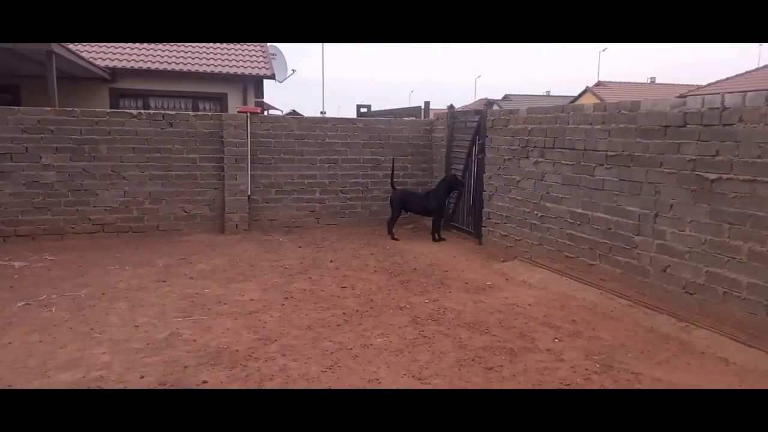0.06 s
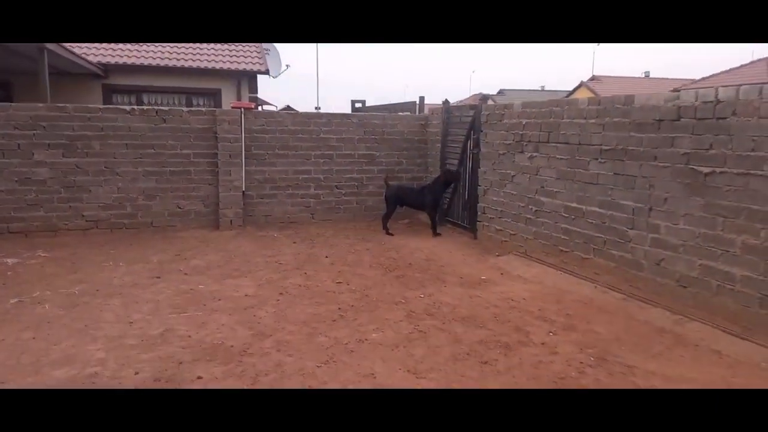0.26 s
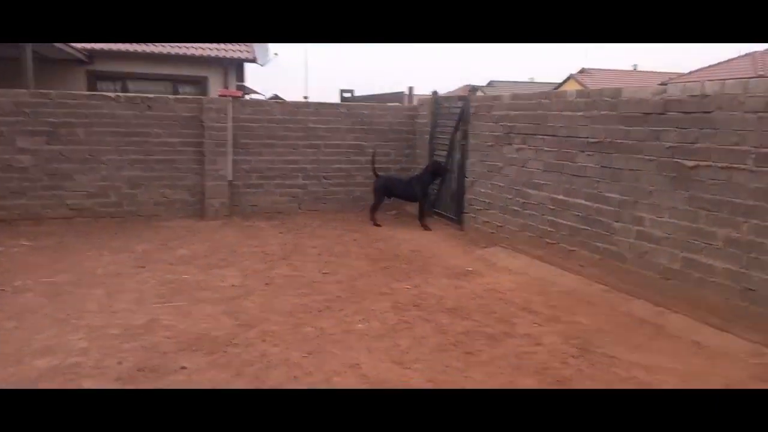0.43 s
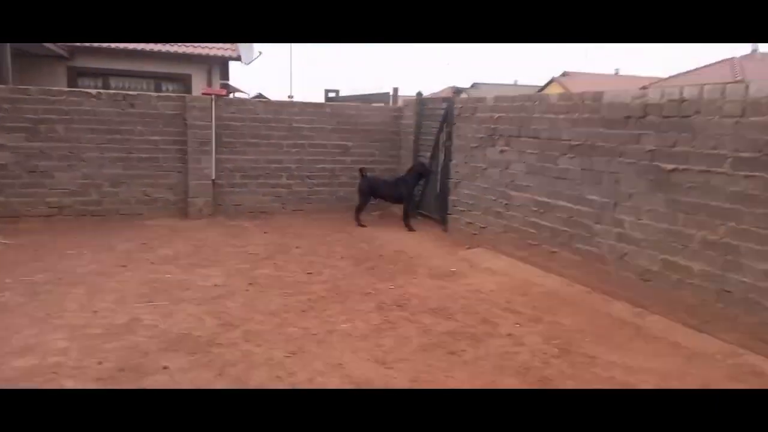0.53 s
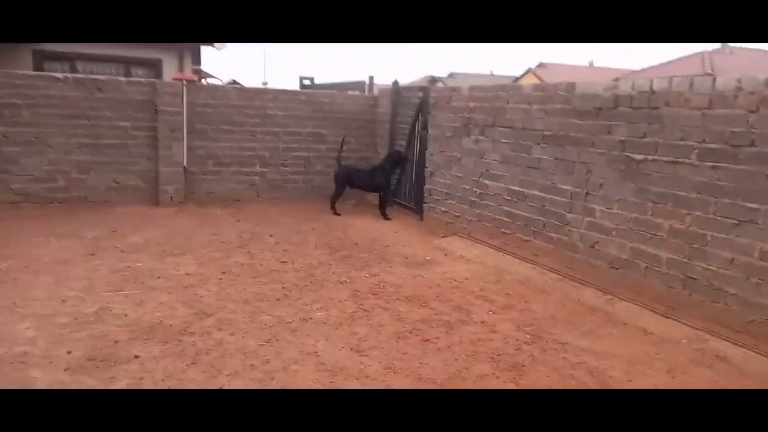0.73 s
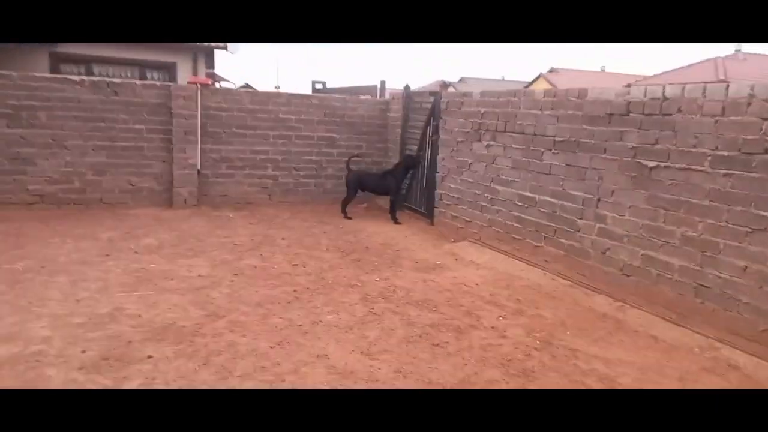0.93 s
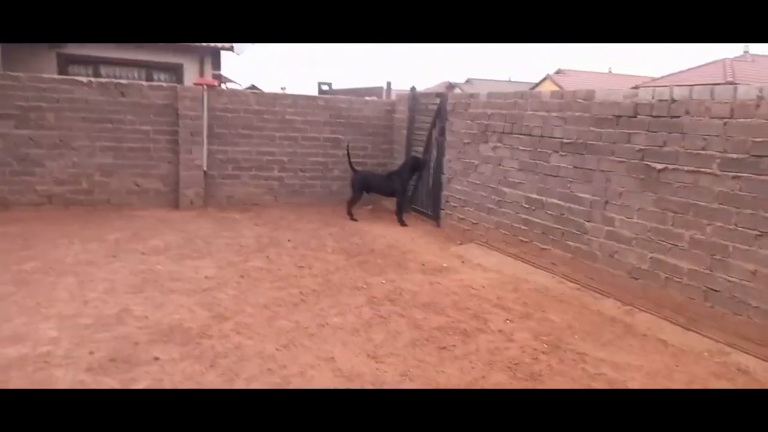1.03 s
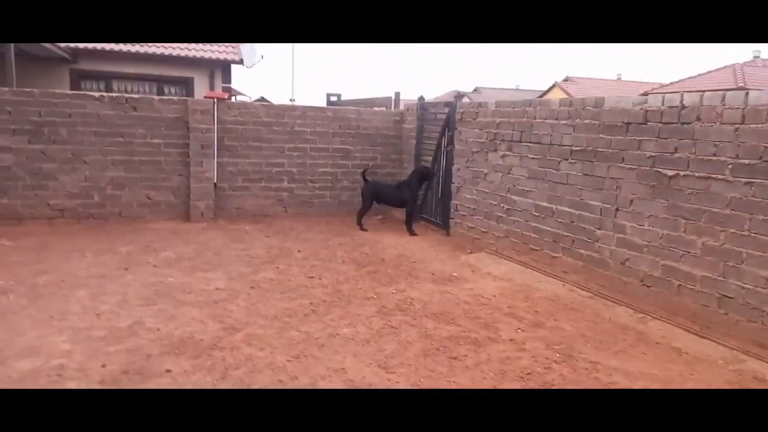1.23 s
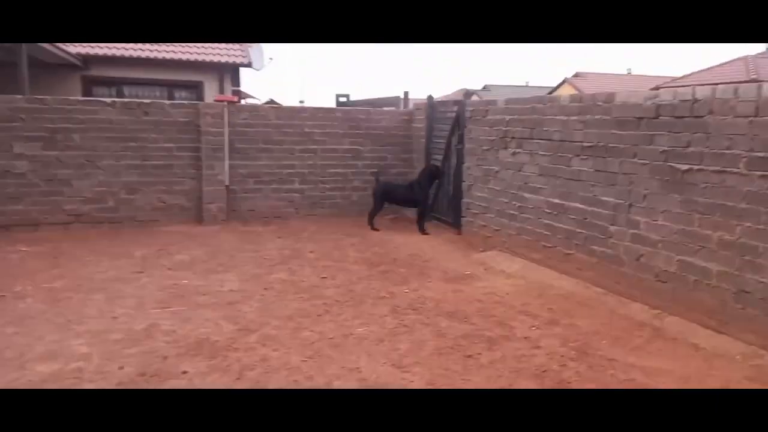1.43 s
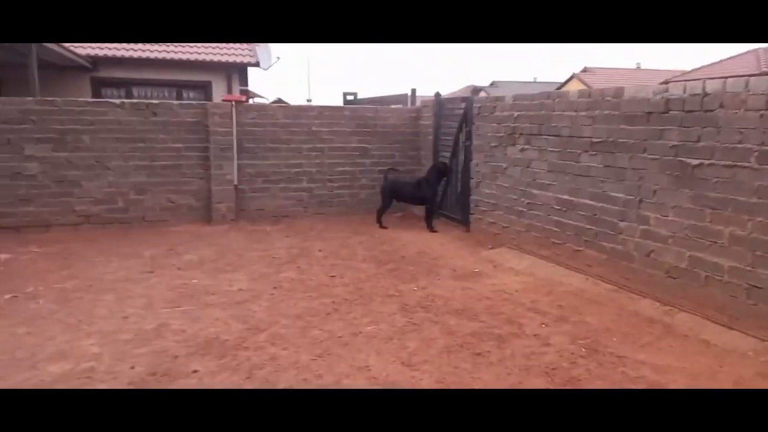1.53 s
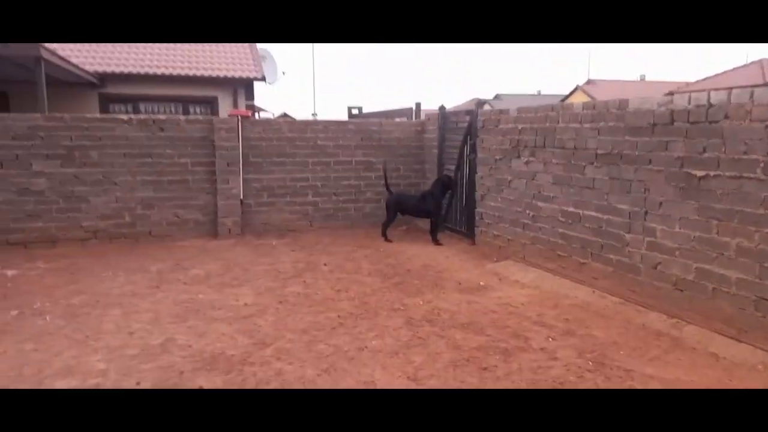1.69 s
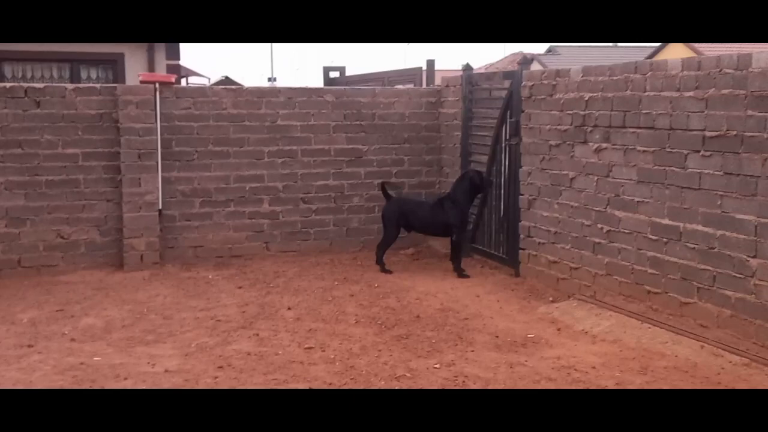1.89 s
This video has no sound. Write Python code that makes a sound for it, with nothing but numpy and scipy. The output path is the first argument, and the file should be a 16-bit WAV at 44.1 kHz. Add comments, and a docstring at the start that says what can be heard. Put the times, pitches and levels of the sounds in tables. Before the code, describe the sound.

Two deep, throaty barks from a big dog echo around a walled yard over faint traffic.

```python
"""Far traffic hums and insects hiss throughout, in a brick-walled yard.
At 0.2 s and again at 0.9 s a large dog barks: a throaty start, a rough rising shout, a clear top note.
Each bark sums a clean fundamental, jittery overtones, a hoarse chest tone and noise; the walls slap it
back and ring on. From 1.3 s a far bird calls, as fluttering overtones of a nearly steady pitch near 680 Hz.
A limiter holds the peaks, which still clip a little."""
import sys
import numpy as np
from scipy import signal
from scipy.fft import rfft, irfft, next_fast_len
from scipy.io import wavfile
from scipy.ndimage import uniform_filter1d, minimum_filter1d, map_coordinates

SR = 44100
rng = np.random.default_rng(int(sys.argv[2]) if len(sys.argv) > 2 else 0)


def volts_from_decibels(level):
    """Turn decibel levels (scalar or array-like) into linear amplitude factors."""
    exponent = np.asarray(level, float) / 20
    return 10 ** exponent


def persist_wave(psi):
    """Save psi, clipped to +-1, as 16-bit WAV."""
    counts = np.round(np.clip(psi, -1, 1) * 32767).astype(np.int16)
    wavfile.write(sys.argv[1], SR, np.atleast_2d(counts).T)


N = 85995

# Spectrum shape of the far traffic and air: (frequency [Hz], relative density [dB per Hz])
TOWN_SPECTRUM = [(15, -31), (25, -35.5), (46, -16.5), (62, -3.5), (118, -6.5), (230, -7), (341, -9.5),
                 (443, -13.5), (1090, -18.5), (1450, -21), (2300, -30), (3500, -36.5), (5000, -44.5),
                 (7800, -47), (10000, -59), (13000, -46.5), (15500, -52.5)]
# Likeness of the town sound on the two sides: (frequency [Hz], correlation [-1 to 1])
TOWN_LIKENESS = [(30, 0.55), (70, 0.94), (150, 0.88), (400, 0.62), (1000, 0), (4000, 0.054)]
# Far bird call: (time [s], pitch [Hz], gain of overtones 2, 3, 4, 5, 6 [dB each])
BIRD_CALL = [(1.32, 700, -80, -80, -75, -80, -85), (1.42, 703, -70, -76, -66, -68, -79),
             (1.5, 690, -57, -75, -72, -74, -78), (1.57, 672, -49, -64, -74, -64, -76),
             (1.66, 682, -50, -52, -72, -60, -73), (1.74, 681, -49, -51, -74, -64, -72),
             (1.8, 679, -56, -55, -76, -67, -78), (1.9, 678, -66, -57, -78, -68, -80),
             (1.95, 677, -75, -70, -85, -80, -85)]
# Single wall echoes: (delay [s], left gain [dB], right gain [dB], extra delay on the right [s])
WALL_ECHOES = [(0.014, -7, -4, .0006), (0.034, -19, -17, -.0008), (0.064, -16, -16, .001),
               (0.099, -14, -13.5, -.0005), (.125, -38.5, -14, .001), (.165, -9, -11, .0002),
               (.2, -25, -17.5, -.001), (.235, -17, -21, .0007)]
# Decay of the diffuse ring: (frequency [Hz], time to fall by 60 dB [s])
RING_DECAY = [(150, 0.53), (400, 0.82), (1000, 0.64), (3000, 0.79), (8000, 0.58)]
# Colour of the bark sent to the walls: (frequency [Hz], gain [dB])
YARD_COLOURING = [(100, 5), (200, -2), (330, 6), (420, -3), (600, -1), (1500, -11.5), (2200, -14),
                  (2700, 1.5), (3300, -15), (6000, -6.5)]
# Breath whistling past the teeth as the mouth opens: (centre time [s], length [s], level [dB])
TEETH_PUFFS = [(0.26, 0.016, -47), (0.942, 0.003, -39)]
# Resonances of throat and mouth: (centre [Hz], width [Hz], gain [dB])
THROAT_RESONANCES = [(455, 72, 8), (762, 234, 3), (1350, 276, -2), (2060, 450, -14), (3040, 1520, -24.5)]
# Spectrum shape of the breath noise: (frequency [Hz], relative gain [dB])
BREATH_SPECTRUM = [(1200, -43), (2000, 5), (3500, 6), (5400, 5), (8000, -12), (10500, -26.5), (13500, -19),
                   (16000, -20.5)]
# One list for each bark: (time [s], pitch [Hz], fundamental level [dB], overtone gain [dB],
# breath level [dB], rasp level [dB], chest tone pitch [Hz], chest tone level [dB])
BARK_COURSES = [
    [(.185, 430, -75, -62, -84, -61.5, 119.5, -50.5), (.215, 430, -38, -56, -76.5, -48, 120, -38),
     (.238, 423.8, -20, -42.5, -58, -28.5, 140, -25), (.247, 441.8, -19, -21, -45, -20, 318, -10),
     (.27, 425, -18, -20, -40, -14, 345, -9), (.285, 385, -9, -13, -37, -13, 368, -12),
     (.31, 400, -3, -10, -37, -16, 385, -28), (.325, 420, 1, -24, -34, -20, 345, -24),
     (.345, 422, 0, -28, -34, -20, 335, -14), (.357, 412, -28, -45, -46, -32, 330, -30)],
    [(.875, 420, -65, -70, -81.5, -70, 119.4, -62), (.9, 421.8, -40, -53.5, -67.5, -47, 125, -37),
     (.92, 428.7, -19.5, -47.5, -60, -31, 140, -29), (.942, 432.9, -23.5, -29.5, -55, -22, 263.5, -18),
     (.955, 445, -4, -22, -46, -17, 315, -17), (.975, 452, -6, -24, -38, -17, 360, -20),
     (.992, 398, -11, -11, -37, -18, 380, -27), (1.008, 412, 0, -13, -34, -18, 340, -28),
     (1.035, 400, -7, -24, -36, -20, 330, -26), (1.056, 378, -7, -28, -39, -23, 310, -23),
     (1.068, 360.7, -40.5, -60.5, -73, -57, 309, -53.5)],
]


def unit(x):
    """Normalisation: a signal divided by its rms has rms 1."""
    return x / np.sqrt(np.mean(x ** 2) + 1e-20)


def along(points, hz):
    """Interpolation of (frequency, value) points on a logarithmic frequency axis."""
    f, v = np.transpose(points)
    return np.interp(np.log(hz + 1), np.log(f + 1), v)


def curves(rows):
    """Linear interpolation in time: one value a sample for each column after the time."""
    s, *cols = np.transpose(rows)
    return [np.interp(np.arange(N) / SR, s, c) for c in cols]


def wobble(rate):
    """Slow random variation: a smooth curve through random knots, rate of them a second."""
    knots = rng.standard_normal(int(N * rate / SR) + 4)
    return map_coordinates(knots, [np.arange(N) * rate / SR])


def flutter(steady, rate):
    """Random amplitude and phase modulation: a steady phasor plus a wandering complex one."""
    return steady + wobble(rate) + 1j * wobble(rate)


def phase_of(hz):
    """Phase [rad] is the running integral of angular frequency."""
    return 2 * np.pi * np.cumsum(hz) / SR


def filtered(x, response):
    """Linear filtering: the spectrum is multiplied by a complex response of frequency."""
    m = next_fast_len(N + SR // 2)
    return irfft(rfft(x, m) * response(np.fft.rfftfreq(m, 1 / SR)), m)[..., :N]


def town():
    """Partially correlated noise: far traffic and air, slightly patchy, bass nearly alike on both sides."""
    def mid_side_response(hz):
        # the split of power between mid and side sets the correlation of left and right
        turn = np.arccos(np.clip(along(TOWN_LIKENESS, hz), -1, 1)) / 2
        return volts_from_decibels(along(TOWN_SPECTRUM, hz)) * [np.cos(turn), np.sin(turn)]

    mid, side = filtered(rng.standard_normal((2, N)), mid_side_response)
    level_db = -38.5 + wobble(5.5)
    return volts_from_decibels(level_db) * unit(np.array([mid + side, mid - side]))


def insects():
    """Amplitude modulation: a narrow band of hiss, independent on each side, swells in fast pulses."""
    centre_hz, half_width_hz = 6640, 644
    pulse_hz, pulse_depth_db = 52, 3.5
    band = filtered(rng.standard_normal((2, N)), lambda f: np.exp(-((f - centre_hz) / half_width_hz) ** 4))
    pulse = np.sin(phase_of(pulse_hz * (1 + 0.29 * wobble(6))))
    level_db = -62.5 + pulse_depth_db * pulse + 1.5 * wobble(3.6)
    return volts_from_decibels(level_db) * unit(band)


def bird():
    """Random interference: air and echoes break each overtone of a long call up, differently on each side."""
    hz, *gains_db = curves(BIRD_CALL)
    phase = phase_of(hz * (1 + 0.0013 * wobble(40)))
    on = np.arange(N) / SR > BIRD_CALL[0][0]

    def one_side():
        call = 0
        for number, gain_db in enumerate(gains_db, start=2):
            overtone = (flutter(1.5, 60) * np.exp(1j * number * phase)).real
            call = call + on * volts_from_decibels(gain_db) * overtone
        return call

    return np.array([one_side(), one_side()])


def wall_slaps(x):
    """Specular reflection: each wall returns a delayed copy, dulled by a first-order low-pass."""
    dull_hz = 6960

    def response(f):
        total = 0
        for delay, left_db, right_db, lag in WALL_ECHOES:
            gains = volts_from_decibels(np.array([[left_db], [right_db]]))
            delays = np.array([[delay], [delay + lag]])
            total = total + gains * np.exp(-2j * np.pi * f * delays)
        return total / (1 + 1j * f / dull_hz)

    return filtered(x, response)


def ring(x):
    """Diffuse reverberation: convolution with noise that builds up, then dies exponentially band by band."""
    ring_db, build_up_s = -4, 0.1
    hz, t, z = signal.stft(rng.standard_normal((2, SR)), SR, nperseg=256)
    decay = volts_from_decibels(-60 * t / along(RING_DECAY, hz)[:, None])
    build_up = 1 - np.exp(-t / build_up_s)
    tail = signal.istft(z * decay * build_up, SR, nperseg=256)[1]
    tail = tail / np.linalg.norm(tail[0])  # unit energy on the left
    return volts_from_decibels(ring_db) * signal.fftconvolve(x[None], tail, axes=1)[:, :N]


def yard(x):
    """Superposition of single reflections and diffuse ring, both driven by a coloured copy of the source."""
    coloured = filtered(x, lambda f: volts_from_decibels(along(YARD_COLOURING, f)))
    return wall_slaps(coloured) + ring(coloured)


def direct(x):
    """Interaural difference: the right side is later, brighter and, in the treble, randomly scattered in phase."""
    lag_s, right_treble_db = .0001, 6  # the boost is reached at 9000 Hz
    scatter_rad, scatter_full_hz, scatter_step_hz = 1.6, 3500, 120
    knots = np.arange(0, SR, scatter_step_hz)
    chance = rng.standard_normal(len(knots))

    def response(f):
        scatter = scatter_rad * np.clip(f / scatter_full_hz, 0, 1) * np.interp(f, knots, chance)
        turn = scatter - 2 * np.pi * f * lag_s
        boost = volts_from_decibels(right_treble_db * np.clip(f / 9000, 0, 1))
        return [np.ones_like(f), boost * np.exp(1j * turn)]

    return filtered(x, response)


def teeth():
    """Turbulence noise: a short narrow hiss, Gaussian in time and frequency, near the start of each bark."""
    centre_hz, width_hz = 5300, 400
    t = np.arange(N) / SR
    hiss = unit(filtered(rng.standard_normal(N), lambda f: np.exp(-((f - centre_hz) / width_hz) ** 2)))
    puffs = sum(volts_from_decibels(db) * np.exp(-((t - s) / length) ** 2) for s, length, db in TEETH_PUFFS)
    return hiss * puffs


def throat(f):
    """Resonance of throat and mouth: parallel second-order band-passes, alternating in sign."""
    total = 0
    for k, (centre, width, db) in enumerate(THROAT_RESONANCES):
        resonance = 1j * f * width / (centre * centre - f * f + 1j * f * width)
        total = total + (-1) ** k * volts_from_decibels(db) * resonance
    return total


def overtones(hz, shaky):
    """Source-filter principle: fluttering lines at multiples of half the pitch, weighted by the throat."""
    half_pitch_gain = .35  # for the lines between the harmonics
    total = 0
    for k in range(1, 14):
        if k == 2:  # the fundamental is a separate clean tone
            continue
        gain = (half_pitch_gain if k % 2 else 1) * abs(throat(k * hz / 2))
        start = 2 * np.pi * rng.random()
        line = flutter(1.2, 110) * np.exp(1j * (k * shaky / 2 + start))
        total = total + gain * line.real / 2
    return total


def bark(rows):
    """Voiced and turbulent excitation: fundamental, overtones, rasp, breath and a chest tone below the pitch."""
    jitter, shimmer_db, pulsed = 0.032, 1.5, .5
    hz, tone_db, over_db, breath_db, rasp_db, chest_hz, chest_db = curves(rows)
    t = np.arange(N) / SR
    on = (t > rows[0][0]) & (t < rows[-1][0])

    phase = phase_of(hz)
    shaky = phase + phase_of(hz * jitter * wobble(150))
    tone = volts_from_decibels(tone_db + shimmer_db * wobble(80)) * np.sin(phase)
    over = volts_from_decibels(over_db) * overtones(hz, shaky)

    # both noises pulse at half the pitch
    air = (1 + pulsed * np.cos(shaky / 2)) * rng.standard_normal((2, N))
    rasp = unit(filtered(air[0], throat))
    breath = unit(filtered(air[1], lambda f: volts_from_decibels(along(BREATH_SPECTRUM, f))))
    chest = unit((flutter(3, 110) * np.exp(1j * phase_of(chest_hz))).real)

    voiced = np.sqrt(2) * (tone + over) + volts_from_decibels(chest_db) * chest
    noise = volts_from_decibels(rasp_db) * rasp + volts_from_decibels(breath_db) * breath
    return on * (voiced + noise)


def scene():
    """Superposition: the dog, heard directly and by way of the yard, adds to the background."""
    background = town() + insects() + bird()
    sources = [teeth()] + [bark(rows) for rows in BARK_COURSES]
    dog = sum(direct(source) + yard(source) for source in sources)
    return background + dog


def roll_off(x):
    """The treble ends steeply here."""
    return signal.sosfilt(signal.butter(12, 15800, fs=SR, output="sos"), x)


def record(dry):
    """Peak limiting and saturation: a fast gain holds the loudest cycles, a knee flattens the rest at full scale."""
    limit_top, hold_s, clip_knee = 1.5, .004, 10  # limit in units of full scale
    span = int(hold_s * SR)
    need = np.minimum(1, limit_top / (abs(dry) + 1e-9))
    held = minimum_filter1d(need, 2 * span, axis=1)
    gain = uniform_filter1d(held, span, axis=1)
    limited = dry * gain
    mix = limited / (1 + abs(limited) ** clip_knee) ** (1 / clip_knee)
    return roll_off(mix)


dry = scene()
out = record(dry)
persist_wave(out)
```